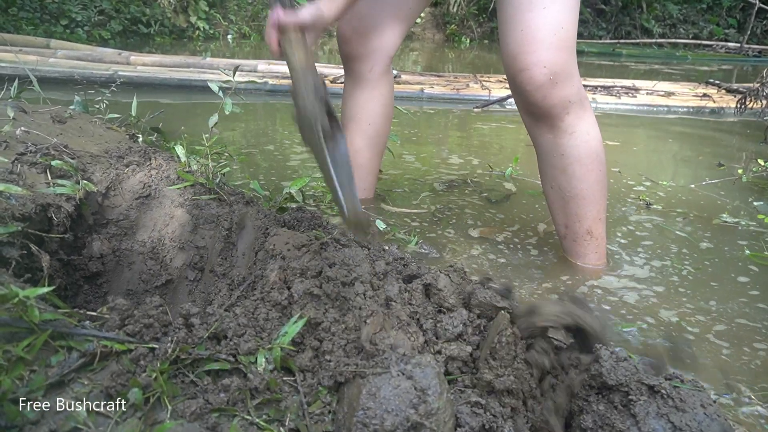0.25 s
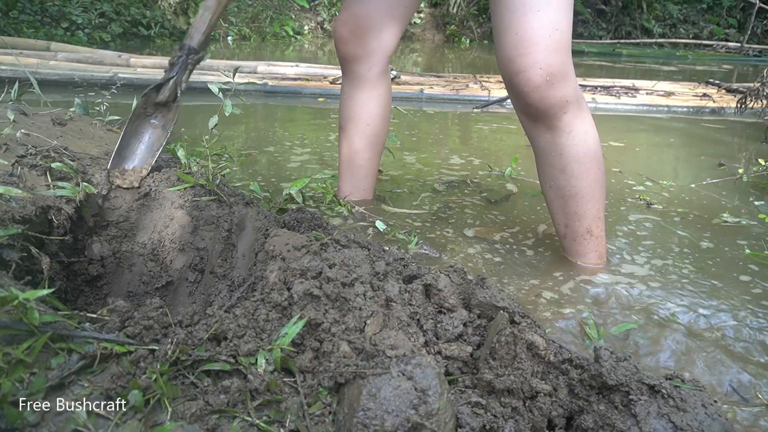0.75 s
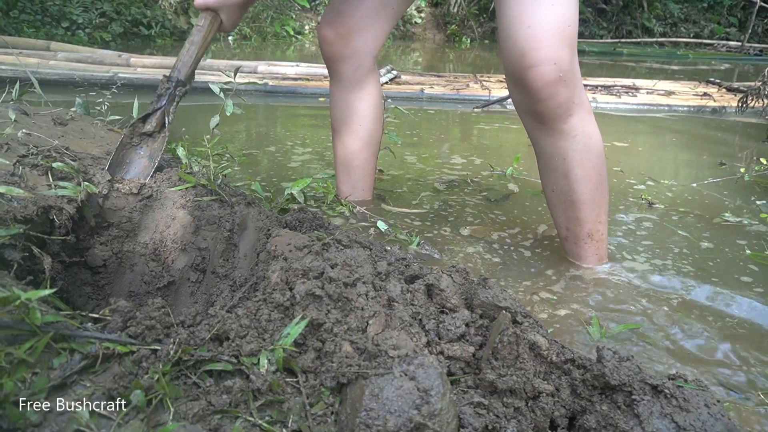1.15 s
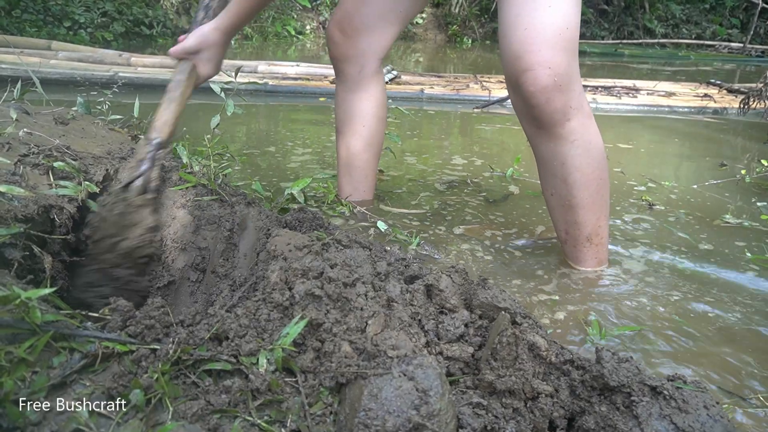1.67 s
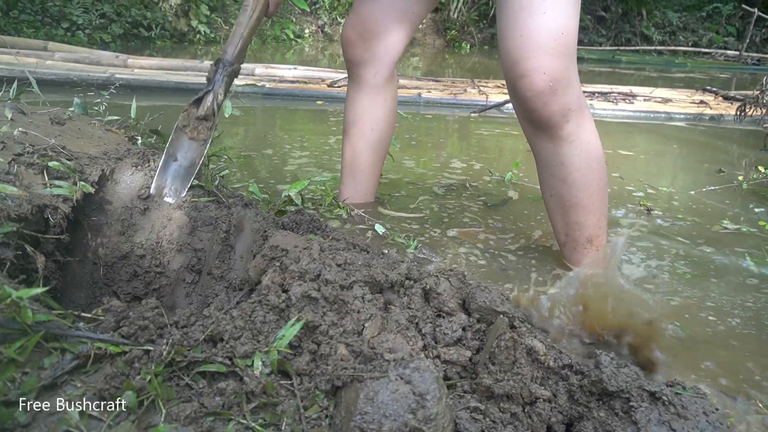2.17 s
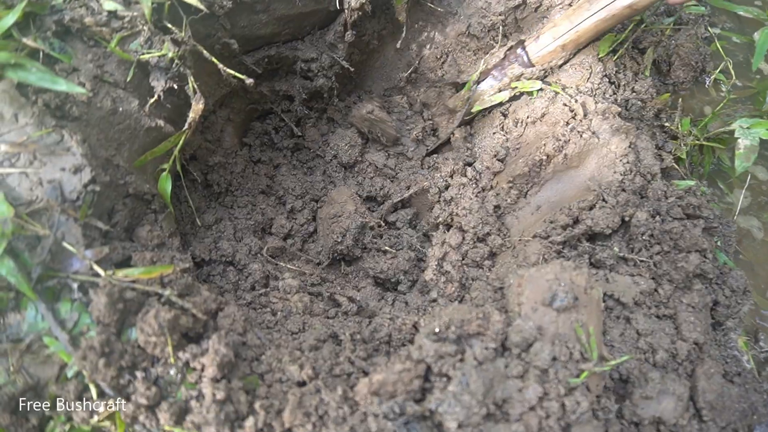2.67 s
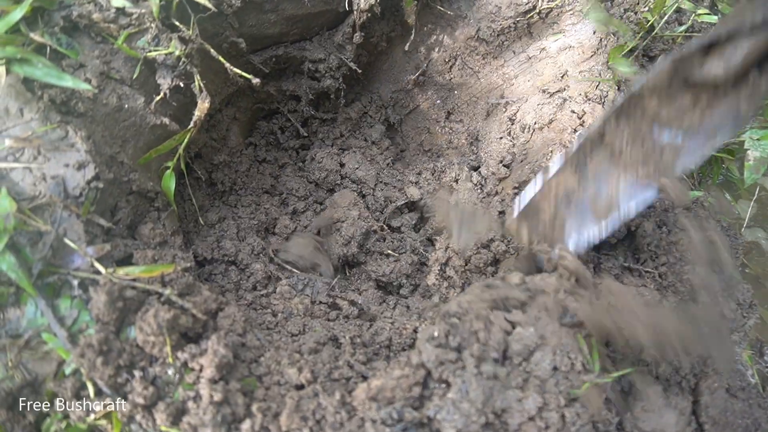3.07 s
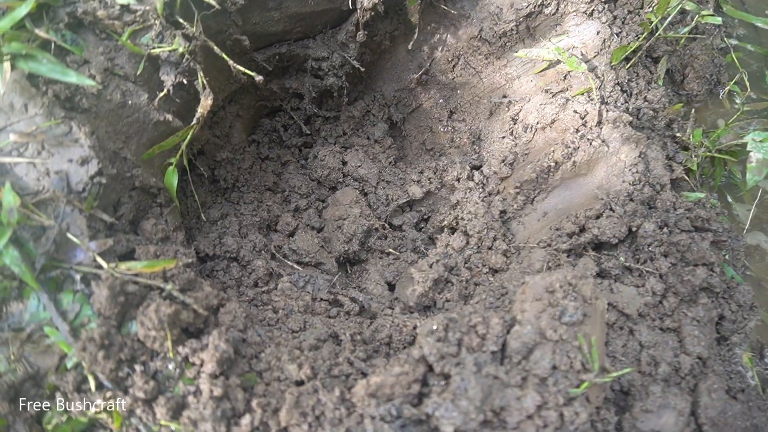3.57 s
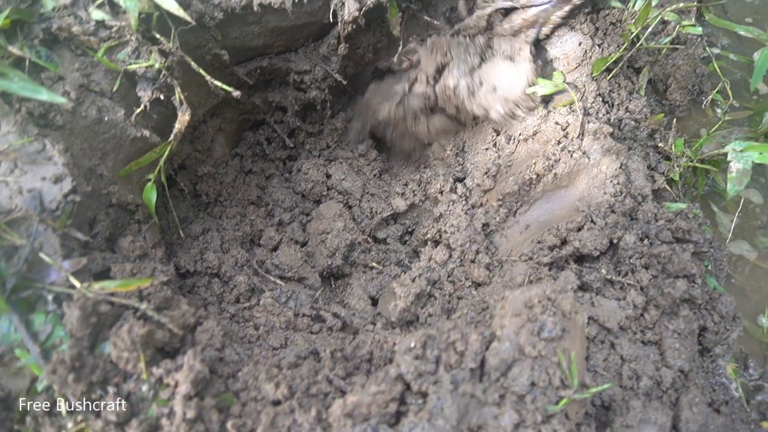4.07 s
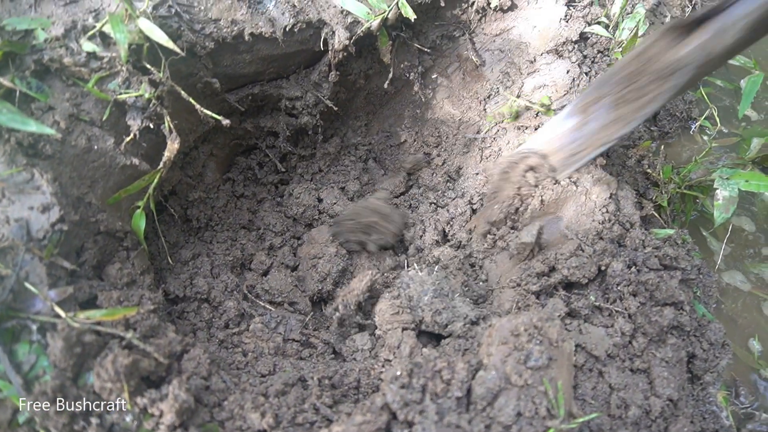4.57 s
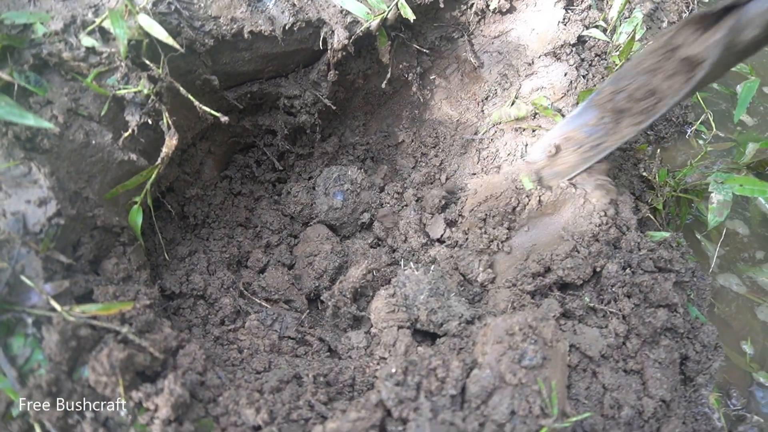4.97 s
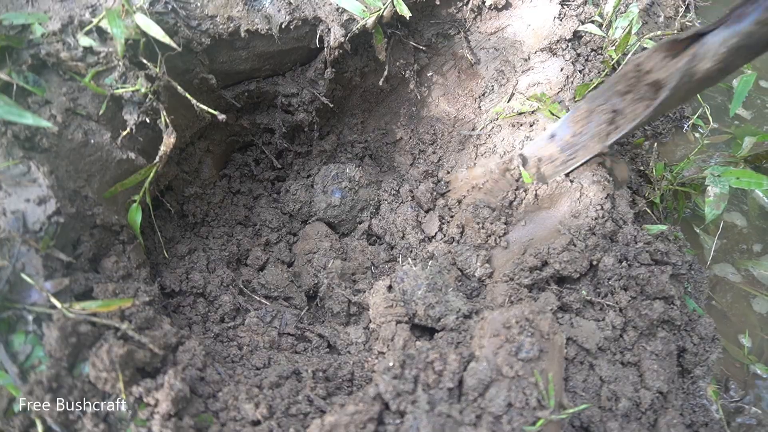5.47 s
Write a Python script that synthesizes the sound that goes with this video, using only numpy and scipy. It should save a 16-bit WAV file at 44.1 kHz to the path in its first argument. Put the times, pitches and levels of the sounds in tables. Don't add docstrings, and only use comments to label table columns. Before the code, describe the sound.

Irregular spade blows thud and rasp through muddy earth outdoors, with small splashes early on and nearer, harsher scraping after an abrupt cut.

```python
import sys
import numpy as np
from scipy import signal
from scipy.fft import rfft, irfft, next_fast_len
from scipy.io import wavfile
from scipy.ndimage import uniform_filter1d, map_coordinates

SR = 44100
rng = np.random.default_rng(int(sys.argv[2]) if len(sys.argv) > 2 else 0)


def generate_wav(signal):
    frames = np.transpose(np.atleast_2d(signal))
    scaled = np.clip(frames, -1, 1) * 32767
    pcm = np.round(scaled).astype(np.int16)
    wavfile.write(sys.argv[1], SR, pcm)


def undo_db(level):
    steps = np.asarray(level, float) / 20
    return 10 ** steps


N = 252693

# fade out from, fade out to, fade in from and fade in to, all in seconds.
SCENE_CHANGE = (2.348, 2.364, 2.379, 2.385)

# centre in Hz, width in Hz, level in dB.
BLADE_MODES = [(1560, 250, -7), (2230, 170, -2), (3150, 260, -2), (4560, 200, 0), (5700, 250, -7),
               (7400, 500, -8)]
# centre in Hz, width in Hz.
SINGING_MODES = [(2120, 58), (3400, 120)]
SINGING_DB = -14.5

# frequency in Hz, density in dB per Hz.
GRIT_COLOUR = [(1500, -15.5), (2400, -5.5), (3100, -1.5), (4600, -3.5), (6000, -3.5), (8500, -15.5)]
COARSE_COLOUR = [(450, -7), (900, -1.5), (1400, 0), (2200, -1), (2900, -4), (4000, -55)]
SAND_COLOUR = [(3000, -6), (5500, -6.5), (7500, -0.5), (11000, -2), (16000, -5.5)]
CRUMBS_COLOUR = [(120, -22), (230, -3), (430, -1), (750, -5.5), (1300, -15.5), (2500, -21.5)]
RUMBLE_COLOUR = [(20, -9), (60, -6.5), (120, -1.5), (200, -5), (350, -27)]
SPLAT_COLOUR = [(300, -10.5), (700, -1.5), (1600, -1), (2600, -4), (4500, -6)]
CRACK_COLOUR = [(1200, -6), (2500, -3.5), (4000, -7.5), (6000, -8.5), (9000, -24)]
FOREST_COLOUR = [(250, -1.5), (500, -5), (1000, 0), (2000, -13), (4000, -8), (8000, -16.5), (16000, -29)]

# start in seconds, grit level in dB,
# seconds to fall 20 dB, coarse soil share in dB, fine sand share in dB.
BITES = [(.142, -38.5, 0.05, -10, -6), (0.3, -34.5, 0.26, -1, -7), (.515, -45.5, 0.1, -1.5, -5),
         (.724, -33.5, 0.1343, 2, 0.5), (.75, -42, 0.35, -5, -0.5), (1.215, -42.5, .5, -3, -12),
         (1.403, -28.5, 0.14, 5, -23), (1.742, -41, 0.03, 0.5, -17), (2.092, -35, 0.12, -3, -3),
         (2.099, -30, 0.04, -9, 1), (2.13, -43.5, 0.8, -1.5, -9), (2.387, -26, 0.1335, 1.5, -1),
         (2.997, -40, 0.18, -0.5, 13.5), (3.122, -30, 0.12, 0, 0.5), (3.998, -28.5, 0.23, -8, -4.5)]
BITE_RISE_S = 0.0065
SETTLE_DB, SETTLE_FALL_S = -20.5, 0.49
# peak in seconds, grit level in dB,
# seconds to rise 20 dB, seconds to fall 20 dB, coarse soil share in dB.
DRAGS_FAR = [
    (.368, -35, 0.21, 0.05, -8.5),
    (.98, -47.5, 0.86, 0, 0),
    (1.39, -39.5, .3, 0, 2),
    (1.452, -31.5, 0.11, 0.105, -8),
    (1.86, -43.5, 0.1, 0.06, -8),
    (2.32, -40, 0.25, 0.5, -5.5),
]
# peak in seconds, grit level in dB, seconds to rise 20 dB,
# seconds to fall 20 dB, coarse soil share in dB.
DRAGS_NEAR = [(2.527, -36, 0.33, .03, 0), (2.73, -43.5, 0.25, 0.3, -3), (2.862, -42.5, 0.25, 0.03, 3.5),
              (3.403, -31.5, 0.053, 0.058, -11), (3.52, -41, 0.17, 0.095, -7.5),
              (3.66, -34, 0.089, 0.77, -1), (3.775, -31, 0.014, 0.14, -4), (3.795, -29.5, .04, 0.051, -5),
              (3.858, -22, 0.08, 0.055, -4), (3.892, -25.5, 0.17, 0.015, -1.5),
              (4.2, -39.5, 0.18, 0.051, -2), (4.28, -48, 0.039, 0.41, -1.5), (4.54, -40, 0.038, .3, -3),
              (4.65, -33, 0.16, 0.086, -6), (4.685, -25, 0.071, 0.034, -9), (4.8, -45.5, 0.088, 0.18, 0),
              (4.864, -37.5, 0.044, 0.28, -8), (5.085, -34.5, 0.028, 0.25, -8),
              (5.143, -20, 0.061, 0.12, -6), (5.24, -31.5, 0.33, 0.067, -23),
              (5.42, -36.5, 0.31, 0.13, -11), (5.587, -30.5, 0.063, 0.06, -18),
              (5.617, -24.5, 0.052, 0.038, -4.5), (5.72, -46, 0.36, .5, -6)]
SAND_DB, SAND_LAGS = -1, 0.17
# grit level in dB, coarse soil share in dB,
# sand share in dB.
TRICKLE = [
    (-59, 3, 1.8),
    (-56.5, -0.5, 2.8),
]

# start in seconds, boom in dB, then shares in dB of shaft bend, knock, crunch.
CHOPS = [(0.649, -35.5, -15, -6, -0.5), (0.723, -25.5, -4, 8, 1.5), (0.769, -29.5, 0, -3.5, -16),
         (1.4, -28, 0, 10.5, 7), (1.459, -36.5, 5, 7, -5), (2.384, -28.5, -22, 4.5, -5),
         (2.451, -50.5, -10, -7, 22), (2.845, -40, -13, -8, -2), (2.996, -45, 0, 3.5, -3),
         (3.12, -27, 1, 11.5, 8), (3.149, -35, 6, -15, -3), (3.278, -51.5, -6, 16, 5),
         (3.805, -50.5, 10, 16, 20), (3.996, -25.5, 7, 8, 3), (4.036, -26, 0, -14, -7.5),
         (4.339, -43, -15, -1, 7), (4.53, -43, -18, 6, 5.5), (4.675, -35, -17, 5.5, 3.5),
         (5.181, -21, 1, 3.5, 0.5), (5.612, -35, 0, -5.5, -0.5)]
# mode in Hz, seconds to fall 60 dB.
SHAFT_FAR = [(76, 0.24), (105, 0.15), (140, 0.21), (222, 0.13), (300, 0.089), (410, 0.059), (650, 0.066)]
SHAFT_NEAR = [(66, 0.23), (102, 0.23), (141, 0.28), (215, 0.13), (290, 0.082), (361, 0.12), (430, 0.076),
              (620, 0.018)]
THUD_DB = -1.5
# start in seconds, level in dB, then the share of each mode in dB.
CLANGS = [
    (0.7219, -9, -9.5, -33, -4.5),
    (1.4016, -13, -23, -18, 0),
    (3.118, -17, -6.5, -10.5, -30.5),
    (3.9963, -13, -35, -14.5, 2),
    (5.1806, -12, -22, -25, -2),
]
# mode in Hz, seconds to fall 60 dB.
CLANG_MODES = [(1330, 0.023), (2080, 0.048), (2850, 0.016)]
WET_FLUTTER_DB, SHAFT_FLUTTER_DB = 2.5, 1.3

# start in seconds, peak in dB, centre in Hz, length in seconds.
CATCHES = [(0.279, -31, 13000, 0.0091), (0.2972, -23, 1500, 0.0024), (0.2972, -23, 4500, 0.0025),
           (0.3015, -15.5, 2820, 0.0024), (0.303, -17.5, 8500, 0.005), (0.3123, -18, 12800, 0.0023),
           (0.319, -24, 1200, 0.0035), (0.32, -19, 5100, 0.011), (0.324, -23, 1990, 0.007),
           (0.3362, -24, 2020, 0.005), (0.3495, -17, 6130, 0.003), (0.3522, -14.5, 5000, 0.0034),
           (0.3577, -17, 2000, 0.0042), (0.359, -35, 8200, 0.006), (0.36, -32, 14500, 0.0028),
           (0.3755, -19, 2500, 0.002), (0.401, -35, 1600, 0.006), (0.433, -33, 10000, 0.0036),
           (0.51, -38, 6000, 0.0037), (0.5128, -29, 12800, 0.0055), (0.5248, -32, 4030, 0.0051),
           (0.546, -32, 9000, 0.004), (0.7373, -29, 2020, 0.0025), (0.7488, -28, 4030, 0.008),
           (0.7628, -31, 2540, 0.004), (1.392, -31, 2190, 0.008), (1.4053, -14.5, 1600, 0.0047),
           (1.4123, -23, 2020, 0.0045), (1.4223, -26, 2020, 0.0035), (1.4273, -24, 2540, 0.0077),
           (1.43, -27, 5800, 0.015), (1.4462, -27, 2540, 0.004), (1.4617, -23, 12800, 0.0035),
           (1.4627, -37, 2020, 0.0085), (1.474, -32, 3000, 0.0078), (1.5305, -33, 2020, 0.0041),
           (2.0895, -29, 11000, 0.005), (2.0902, -33.5, 3200, 0.0155), (2.099, -19.5, 2010, 0.0029),
           (2.099, -17, 10900, 0.004), (2.0992, -17, 5080, 0.0047), (2.139, -39, 900, 0.0044),
           (2.162, -37, 2500, 0.003), (2.182, -35, 1600, 0.005), (2.182, -25, 5080, 0.005),
           (2.209, -28, 10160, 0.0055), (2.2274, -22, 10160, 0.0054), (2.2424, -27, 3200, 0.0029),
           (2.2559, -25.5, 800, 0.0071), (2.292, -27, 5450, 0.009),
           (2.3895, -10.5, 3050, 0.003), (2.4015, -24, 10160, 0.013), (2.4025, -19, 4030, 0.003),
                (2.4165, -17, 2020, 0.003), (2.428, -18.5, 2320, 0.012), (2.493, -23, 2540, 0.0035),
                (2.5051, -19.5, 2500, 0.0038), (2.5547, -26.5, 5050, 0.0036), (2.7128, -20, 12800, 0.0055),
                (2.844, -26.5, 3980, 0.0055), (2.912, -26, 3180, 0.002), (2.9959, -23, 2000, 0.0036),
                (3.276, -24, 10160, 0.0035), (3.295, -31.5, 1600, 0.003), (3.3968, -37, 3230, 0.022),
                (3.3968, -27, 4030, 0.006), (3.6395, -29, 2540, 0.003), (3.653, -30, 2000, 0.004),
                (3.6597, -26, 2540, 0.003), (3.6906, -28, 2540, 0.0027), (3.6936, -30, 4030, 0.0075),
                (3.698, -29, 1600, 0.0031), (3.7124, -23.5, 1600, 0.003), (3.7375, -21, 4030, 0.0027),
                (3.7704, -30, 1270, 0.003), (3.7864, -18, 2540, 0.0039), (3.7904, -20, 4030, 0.013),
                (3.8039, -20.5, 2000, 0.0045), (3.8607, -16, 2540, 0.0081), (3.9957, -16, 3200, 0.0076),
                (4.011, -30, 2020, 0.006), (4.0378, -23, 2540, 0.0041), (4.66, -25, 8060, 0.016),
                (4.6614, -25, 12800, 0.018), (4.664, -21, 1840, 0.029), (4.6738, -16.5, 5080, 0.0026),
                (4.6829, -17.5, 1910, 0.0041), (4.6924, -20, 2540, 0.0025), (4.7058, -19, 2020, 0.0023),
                (5.0889, -28, 3200, 0.003), (5.114, -26, 2020, 0.005), (5.1273, -21, 3200, 0.0185),
                (5.1363, -16, 4050, 0.015), (5.1423, -13, 2540, 0.0041), (5.2062, -28, 3200, 0.0105),
                (5.2176, -27, 794, 0.0055), (5.5778, -28, 4000, 0.004), (5.598, -15.5, 4300, 0.021),
                (5.605, -9, 4600, 0.0017), (5.6224, -12.5, 2600, 0.0028),
           (.2975, -28, 600, 0.0036), (.376, -28, 805, 0.0028), (.64, -33.5, 2700, .008),
         (2.453, -21, 600, .003), (2.712, -25.5, 2650, 0.0034), (3.6528, -21, 3200, 0.0017),
         (3.8043, -16, 1200, 0.0013), (4.672, -28.5, 278, 0.015), (5.615, -22.5, 1220, .008),
         (2.272, -33, 1500, 0.0087), (2.279, -31, 2500, .006), (2.108, -31, 1690, 0.018)]
CATCH_WIDTH, CATCH_ALIKE = 0.38, 0.9
CATCH_DB, CATCH_SHORTER_S = 1.5, .0012
SNAP_S = .0008

# start in seconds, peak in dB, pitch in Hz, ringing share in dB, fine spray share in dB.
STRIKES = [(.723, -6.5, 486, -8, -20), (1.401, -4, 1490, -7.5, -22.5), (2.385, -9.5, 1690, -6.5, -12.5),
           (2.392, -14.5, 2040, 7, -23), (2.453, -2.5, 2240, -2, -23), (2.7155, -14, 600, -3, -6),
           (2.995, -9.5, 462, -8.5, -2.5), (3.121, -5.5, 383, -0.5, -21), (3.273, -25, 5250, 3, 1.5),
           (3.804, -7, 580, -5.5, -26), (3.995, -3, 461, -2, -22), (5.161, -8.5, 2300, -5, -21),
           (5.18, -6.5, 450, 0, -29), (5.605, -9, 4560, -1, -7), (5.6225, -9, 1600, -7, -20)]
# start in seconds, peak in dB, pitch in Hz, fine spray share in dB.
STONES = [(1.216, -22, 4930, -21), (1.272, -20, 2140, -22.5), (1.462, -21, 2070, -7),
          (1.53, -22.5, 755, -30), (1.739, -21.5, 2660, -23), (1.781, -25, 2260, -38),
          (1.844, -29.5, 2450, -4.5), (2.5045, -26, 2390, -30), (2.766, -21, 665, -18.5),
          (2.844, -22, 3960, -21), (2.859, -22, 726, -4.5), (2.903, -19, 2690, -14), (3.264, -25, 4840, -3),
          (3.295, -22, 1580, -28), (3.64, -25, 2380, -18), (3.652, -16, 2390, -24),
          (3.698, -18.5, 1570, -20), (3.717, -15, 2310, -18), (4.034, -9.5, 2170, -20),
          (4.179, -19, 2930, -10.5), (4.416, -23, 455, -14), (4.615, -17.5, 1710, -16),
          (4.686, -16, 2230, -10), (4.705, -19, 1800, -25), (4.972, -25.5, 3160, -7)]
# start in seconds, peak in dB, pitch in Hz, ringing share in dB.
DROPS = [(.1345, -19.5, 763, -3), (.179, -30.5, 2730, 0), (.22, -30, 4740, -19), (.279, -32, 5630, -6),
         (0.2973, -22, 3300, -7), (.302, -17, 3270, -10), (.3195, -14, 690, -5.5), (0.324, -14, 1890, 1),
         (.35, -22, 5630, -3), (.359, -15, 900, -6.5), (0.375, -21, 4020, 3), (0.413, -15.5, 730, 0),
         (0.453, -23.5, 3800, -2), (.511, -13, 543, -4), (.546, -20, 3600, -9), (.555, -21, 1490, 0),
         (.626, -31, 3400, 0), (2.099, -12.5, 1390, -13), (2.138, -22, 750, 0), (2.152, -20.5, 520, 3.5),
         (2.161, -20, 490, -6.5), (2.182, -19.5, 834, -14), (2.209, -20, 1570, 1), (2.228, -20.5, 3820, -1),
         (2.242, -21.5, 860, -16), (2.293, -20, 3570, -3)]
DROP_SPRAY_DB, STONE_RING_DB = -14, -5

# level in dB over its crunch, seconds to rise 20 dB, seconds to fall 20 dB.
CRUMBLE = (-26.5, .03, 0.42)
# level in dB over its boom, seconds to rise 20 dB, seconds to fall 20 dB.
SHUDDER = (-23.5, 0.022, 0.34)
CRUMBS_DB, RUMBLE_DB = (-53, -48.5), (-61, -61)

# start in seconds, length in seconds, first pitch in Hz, last pitch in Hz, level in dB.
GLIDES = [
    (2.2562, .025, 680, 2700, -23),
    (2.143, 0.0062, 1960, 2020, -24.5),
    (.455, .052, 3900, 3400, -49),
    (2.874, .027, 667, 740, -37),
]
FADE_DB_PER_OCTAVE = -6.5

# pitch in Hz, width in Hz.
INSECTS = [
    (4800, 80),
    (9100, 420),
]
# peak
# in seconds, level in dB, seconds to rise 20 dB, seconds to fall 20 dB.
BOUTS = [
    (.1, -58, 2.5, 2),
    (1.97, -53, .5, 2),
    (3.8, -43, 0.17, 0.46),
    (3.795, -29.5, 0, 0.05),
    (5.143, -27, .03, 0.02),
    (3.8, -52, 1.5, .5),
    (5.53, -50, .03, 2.5),
]
HUM_DB, DRONE_DB = -65, (-59, -61.5)

# frequency in Hz, left-right likeness from 0 to 1.
ALIKE = [(100, 0.97), (250, 0.88), (500, 0.84), (1000, 0.66), (2500, 0.48), (5000, 0.38), (10000, 0.24)]
# frequency in Hz, share from 0 to 1.
SPREAD = [(250, .01), (600, 0.39), (1200, 1), (10000, 1)]
# time in seconds, left over right in dB.
LEAN = [(0.0, -2.5), (0.33, -8.5), (0.75, -6), (0.86, 1.5), (2.23, -4.5), (2.76, -1), (3.85, -5.5),
        (3.94, -2), (5.63, -4), (5.73, -1.5)]


def unit(x):
    return x / np.sqrt(np.mean(x ** 2) + 1e-20)


def along(points, hz):
    f, v = np.transpose(points)
    return np.interp(np.log(hz + 1), np.log(f + 1), v)


def curves(rows):
    s, *cols = np.transpose(rows)
    return [np.interp(np.arange(N) / SR, s, c) for c in cols]


def wobble(rate):
    steps = np.arange(0, N + 16, 16)
    knots = rng.standard_normal(int(N * rate / SR) + 4)
    return np.interp(np.arange(N), steps, map_coordinates(knots, [steps * rate / SR]))


def filtered(x, response):
    m = next_fast_len(N + 4096, real=True)
    return irfft(rfft(x, m) * response(np.fft.rfftfreq(m, 1 / SR)), m)[..., :N]


def shape(points):
    closed = [(points[0][0] / 2, -120)] + points + [(points[-1][0] * 2, -120)]
    return lambda hz: undo_db(along(closed, hz))


def grainy(spectrum, share, spike_db, lumps_db, patchy_db):
    chance = rng.random(N)
    height = np.minimum(np.log(share / np.minimum(chance, share)), 3)
    spikes = (chance < share) * undo_db(spike_db * height)
    lumps = undo_db(lumps_db * (wobble(25) + wobble(90)))
    z = signal.stft(rng.standard_normal((2, N)), nperseg=256)[2]
    field = uniform_filter1d(rng.standard_normal(z.shape[1:]), size=2, axis=0)
    field = uniform_filter1d(field, size=8, axis=1)
    pair = signal.istft(z * undo_db(patchy_db * unit(field)), nperseg=256)[1][:, :N]
    pair = pair * lumps * (1 + uniform_filter1d(spikes, size=5) * 5)

    def colour(hz):
        turn = np.arccos(np.clip(along(ALIKE, hz), -1, 1)) / 2
        return spectrum(hz) * [np.cos(turn), np.sin(turn)]
    mid, side = filtered(pair, colour)
    return unit(np.array([mid + side, mid - side]))


def placed(pair, pan_db):
    lean = pair * (undo_db([pan_db / 2, -pan_db / 2]) - 1)
    return pair + filtered(lean, lambda hz: along(SPREAD, hz))


def swells(rows):
    s, db, rise, fall = np.transpose(rows)[:, :, None]
    t = np.arange(0, N + 32, 32) / SR
    level_db = db - 20 * np.maximum((s - t) / rise, (t - s) / fall)
    return np.interp(np.arange(N) / SR, t, np.linalg.norm(undo_db(level_db), axis=0))


def by_place(far_db, near_db):
    return np.where(np.arange(N) / SR < SCENE_CHANGE[2], undo_db(far_db), undo_db(near_db))


def soil_gains():
    strokes = []
    for s, db, fall, coarse, sand in BITES:
        strokes.append((s, db, BITE_RISE_S, fall, 0, coarse, sand))
        strokes.append((s, db + SETTLE_DB, BITE_RISE_S, SETTLE_FALL_S, 0, coarse / 2, sand / 2))
    for s, db, rise, fall, coarse in DRAGS_FAR + DRAGS_NEAR:
        strokes.append((s, db, rise, fall, 0, coarse, SAND_DB - SAND_LAGS * (db + 38)))
    gains = []
    for k in range(3):
        rest = by_place(*[db + [0, *shares][k] for db, *shares in TRICKLE])
        moving = swells([(s, db + shares[k], rise, fall) for s, db, rise, fall, *shares in strokes])
        gains.append(np.hypot(rest, moving))
    return gains


def scrape():
    grit_gain, coarse_gain, sand_gain = soil_gains()

    def steel(f):
        return 1 + 2.0 * sum(undo_db(db) * f * w / np.hypot(c * c - f * f, f * w) for c, w, db in BLADE_MODES)
    coarse = grainy(lambda hz: shape(COARSE_COLOUR)(hz) * steel(hz),
                    share=.003, spike_db=1.5, lumps_db=1.3, patchy_db=2.5)
    grit = grainy(lambda hz: shape(GRIT_COLOUR)(hz) * steel(hz),
                  share=0.0094, spike_db=2.5, lumps_db=1.5, patchy_db=2.0)
    sand = grainy(shape(SAND_COLOUR), share=0.0031, spike_db=2.0, lumps_db=1.63, patchy_db=1.5)
    return undo_db(-1.18) * grit_gain * grit + undo_db(-1.5) * coarse_gain * coarse + undo_db(0.4) * sand_gain * sand


def singing():
    def tones(f):
        return sum(np.exp(-((f - hz) / width) ** 2) for hz, width in SINGING_MODES)
    song = unit(filtered(rng.standard_normal(N), tones))
    return by_place(SINGING_DB, -120) * soil_gains()[0] * song


def chops():
    out, t = np.zeros(N + SR), np.arange(SR // 3) / SR
    crunch = grainy(shape(CRUMBS_COLOUR), share=0.0055, spike_db=0.5, lumps_db=0.5, patchy_db=3.0)
    crunch_gain = np.zeros(N + SR)
    detune = rng.standard_normal((len(CHOPS), 8))
    for (s, boom_db, bend_db, knock_db, crunch_db), chances in zip(CHOPS, detune):
        shares_db = [0, bend_db, knock_db + THUD_DB, knock_db, crunch_db]
        modes = SHAFT_FAR if s < SCENE_CHANGE[2] + .05 else SHAFT_NEAR
        start = round(s * SR)
        for (hz, t60), chance in zip(modes, chances):
            share_db = shares_db[np.searchsorted([120, 190, 320, 520], hz)]
            rise = 1 - np.exp(-t * hz / 0.75)
            tone = np.sin(2 * np.pi * hz * (1 + 0.027 * chance) * t)
            out[start:][:len(t)] += undo_db(boom_db + share_db - 0.5 - 60 * t / t60) * rise * tone
        crunch_fall = undo_db(boom_db + crunch_db - 1.5 - 60 * t / 0.14)
        crunch_gain[start:][:len(t)] += crunch_fall * (1 - np.exp(-t / 0.001))
    return out[:N], crunch_gain[:N] * crunch


def clangs():
    out, t = np.zeros(N + SR), np.arange(SR // 10) / SR
    for s, db, *shares_db in CLANGS:
        for (hz, t60), share_db in zip(CLANG_MODES, shares_db):
            ring = undo_db(db + share_db + 1.0 - 60 * t / t60) * (1 - np.exp(-t / 0.0003))
            out[round(s * SR):][:len(t)] += ring * np.sin(2 * np.pi * hz * t)
    return out[:N] * undo_db(1.6 * wobble(400))


def catches():
    out, rows = np.zeros((2, N + SR)), CATCHES
    t = np.arange(SR // 12) / SR
    turn = np.arccos(np.clip(CATCH_ALIKE, 0, 1)) / 2
    for (s, db, hz, length), noise in zip(rows, rng.standard_normal((len(rows), 2, len(t)))):
        u = 2.34 * t / max(length - CATCH_SHORTER_S, .0006)
        edges = hz * np.exp(np.array([-.5, .5]) * (CATCH_WIDTH + SNAP_S / length))
        band = signal.butter(2, np.minimum(edges, [15000, 17000]), "bandpass", fs=SR, output="sos")
        mid, side = signal.sosfilt(band, noise * u * np.exp(-u))
        size = undo_db(db + CATCH_DB) / np.abs(signal.hilbert(mid)).max()
        out[:, round(s * SR):][:, :len(t)] += size * (mid + np.tan(turn) * side * [[1], [-1]])
    return out[:, :N]


def ticks():
    rings, splats, cracks, sprays = np.zeros((4, N + SR))
    t = np.arange(SR // 5) / SR
    burst = (undo_db(-60 * t / 0.015) + undo_db(-8.5 - 60 * t / 0.073)) * (1 - np.exp(-t / 0.00027))
    impacts = STRIKES + [(*drop, DROP_SPRAY_DB) for drop in DROPS]
    impacts += [(s, db, hz, STONE_RING_DB, spray_db) for s, db, hz, spray_db in STONES]
    for s, db, hz, ring_db, spray_db in impacts:
        start = round(s * SR)
        life = 0.0052 + 10 / hz
        swell = 1 - np.exp(-t * hz / 1.27)
        tone = np.sin(2 * np.pi * hz * t * (1 + 0.59 * t))
        rings[start:][:len(t)] += undo_db(db + ring_db - 60 * t / life) * swell * tone
        hardness = np.clip(hz / 4200, .25, .9)
        impact = undo_db(db - 14.5 - ring_db / 2) * burst
        splats[start:][:len(t)] += (1 - hardness) * impact
        cracks[start:][:len(t)] += hardness * undo_db(1.5) * impact
        sprays[start:][:len(t)] += undo_db(db + spray_db - 2.5) * burst
    splat, crack, spray = [grainy(shape(colour), share=.003, spike_db=0, lumps_db=0, patchy_db=1.5)
                           for colour in (SPLAT_COLOUR, CRACK_COLOUR, SAND_COLOUR)]
    return rings[:N], splats[:N] * splat + cracks[:N] * crack + sprays[:N] * spray


def after_chops(over_db, rise, fall, crunchy):
    return swells([(s + rise, db + over_db + crunchy * crunch_db, rise, fall) for s, db, *_, crunch_db in CHOPS])


def earth():
    crumbs = grainy(shape(CRUMBS_COLOUR), share=.002, spike_db=2, lumps_db=1.5, patchy_db=2)
    rumble = grainy(shape(RUMBLE_COLOUR), share=.0005, spike_db=1, lumps_db=1.5, patchy_db=.5)
    crumbs_gain = np.hypot(by_place(*CRUMBS_DB), after_chops(*CRUMBLE, True))
    rumble_gain = np.hypot(by_place(*RUMBLE_DB), after_chops(*SHUDDER, False))
    return crumbs_gain * crumbs + rumble_gain * undo_db(3.5) * rumble


def glides():
    out = np.zeros(N)
    for s, length, from_hz, to_hz, db in GLIDES:
        fade_db = FADE_DB_PER_OCTAVE * np.log2(to_hz / from_hz)
        u = np.arange(round(length * SR)) / (length * SR)
        phase = 2 * np.pi * np.cumsum(from_hz * (to_hz / from_hz) ** u) / SR
        ramps = np.minimum(1, np.minimum(15 * u, 8 * (1 - u)))
        out[round(s * SR):][:len(u)] += undo_db(db + fade_db * u) * ramps * np.sin(phase)
    return out * undo_db(3 * wobble(300) + [[-2.5], [2.5]])


def forest():
    leaves = grainy(shape(FOREST_COLOUR), share=.0002, spike_db=1, lumps_db=.6, patchy_db=1.2)
    air = undo_db(-52.5) * leaves
    gains = np.hypot(undo_db(HUM_DB), swells(BOUTS)), by_place(*DRONE_DB)
    for (hz, width), gain in zip(INSECTS, gains):
        song = filtered(rng.standard_normal((2, N)), lambda f: np.exp(-((f - hz) / width) ** 2))
        air += gain * undo_db(1.5 * wobble(12) + 1.2 * wobble(12)[::-1]) * unit(song)
    return air


def scene():
    soil, (rings, puffs), steel = scrape(), ticks(), clangs()
    ground, (shaft, crunch) = earth(), chops()
    bank = ground + crunch + glides() + forest()
    spade = soil + puffs + steel + catches() + singing() + rings * undo_db(WET_FLUTTER_DB * wobble(500))
    return bank + shaft * undo_db(SHAFT_FLUTTER_DB * wobble(35)) + placed(spade, curves(LEAN)[0])


def roll_off(x):
    return signal.sosfilt(signal.butter(12, 16970, fs=SR, output="sos"), x)


def record(dry):
    fade = np.interp(np.arange(N) / SR, SCENE_CHANGE, [1, 0, 0, 1])
    limited = filtered(dry, lambda hz: np.where(hz < 15850, 1, .003))
    return roll_off(fade * limited)


dry = scene()
out = record(dry)
generate_wav(out)
```